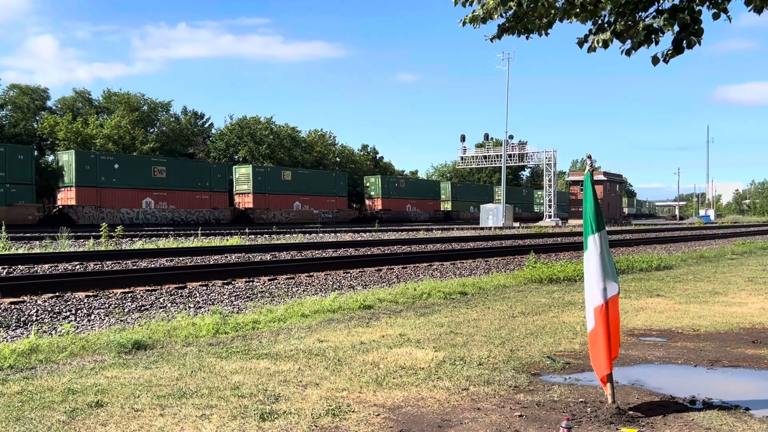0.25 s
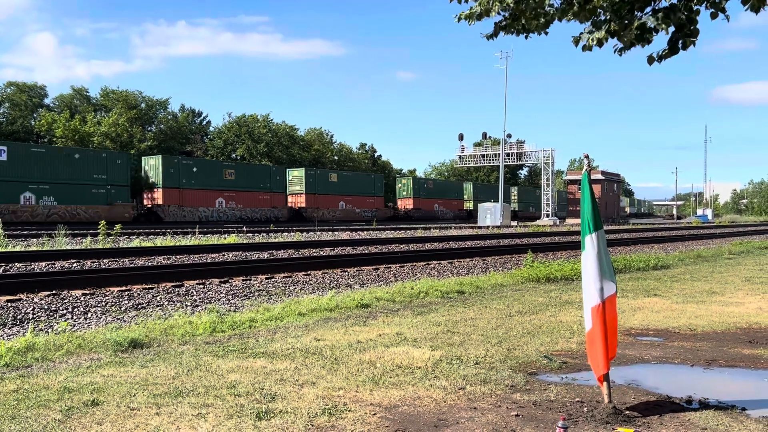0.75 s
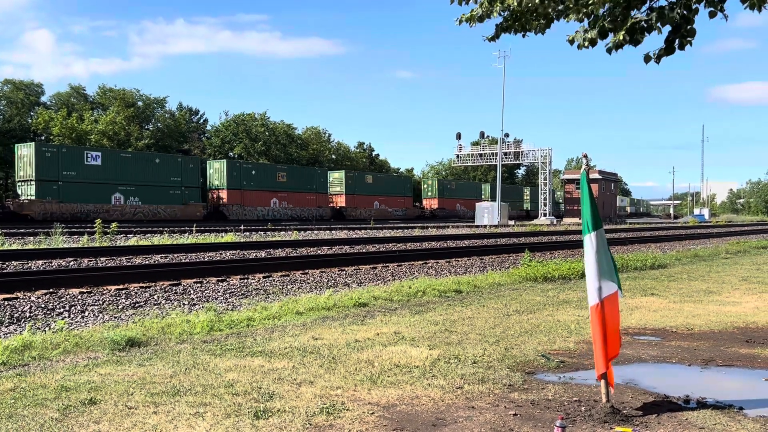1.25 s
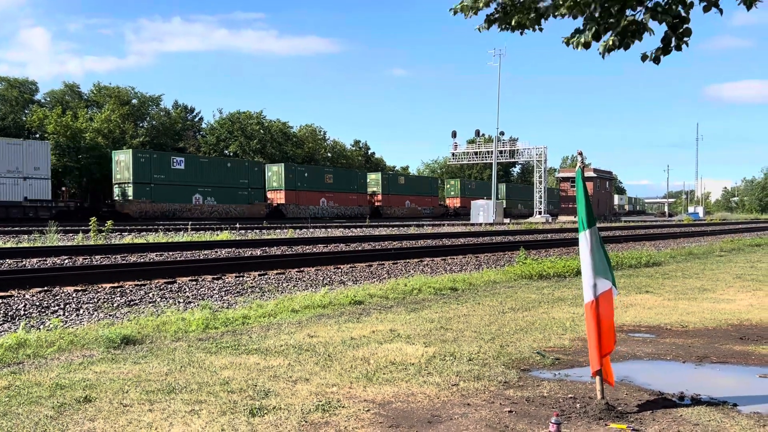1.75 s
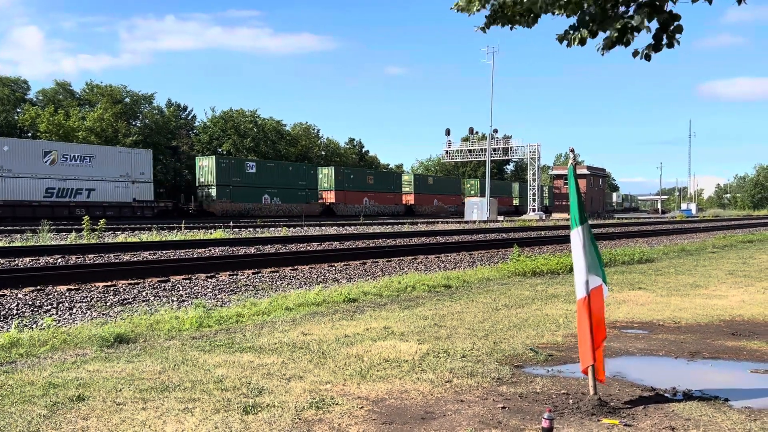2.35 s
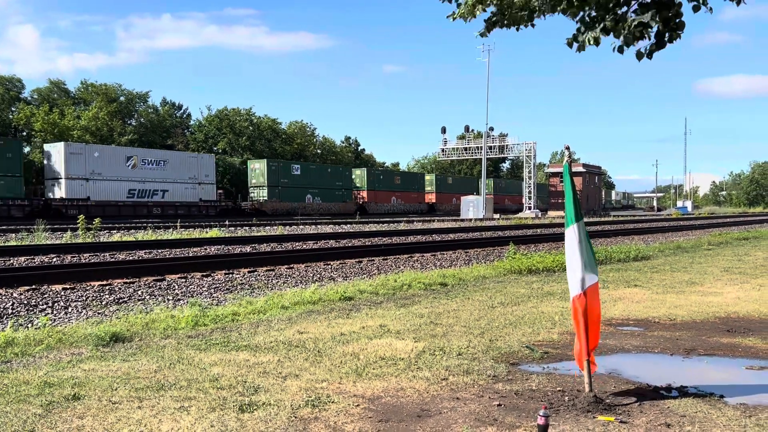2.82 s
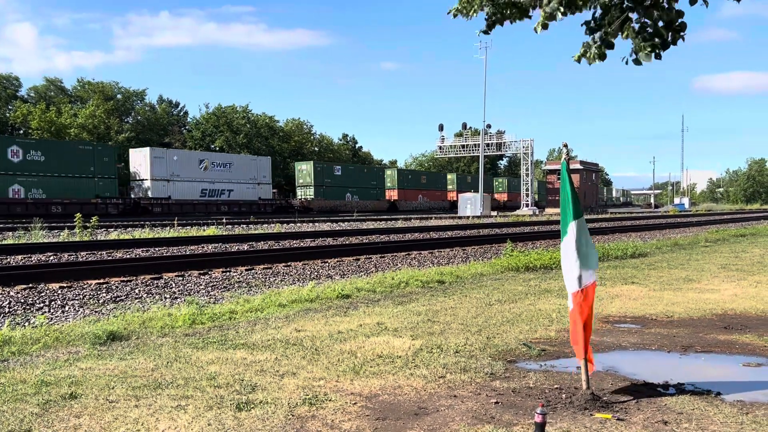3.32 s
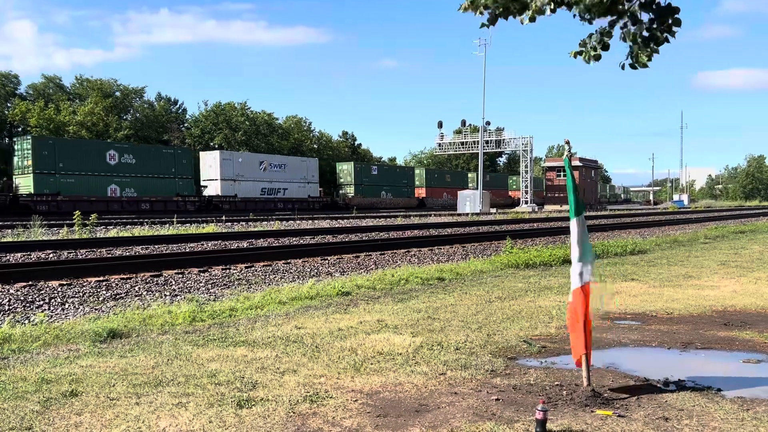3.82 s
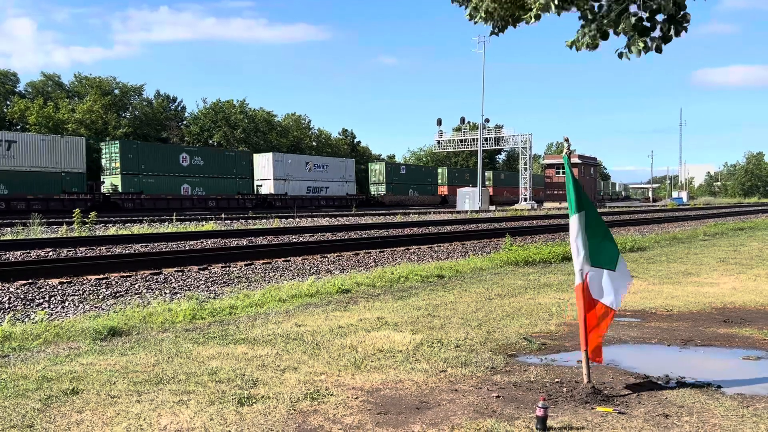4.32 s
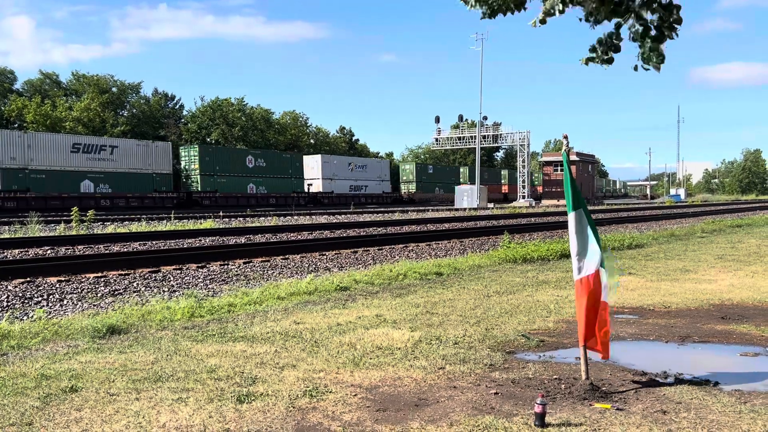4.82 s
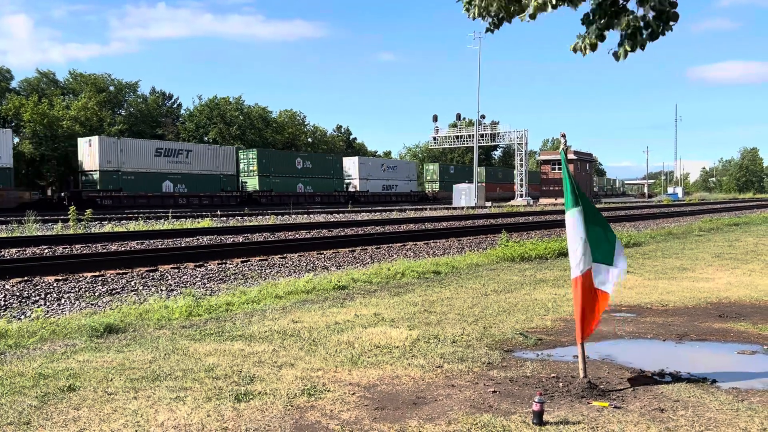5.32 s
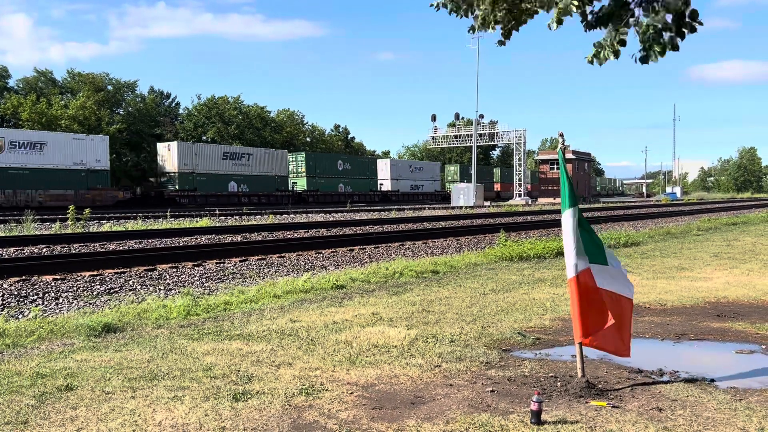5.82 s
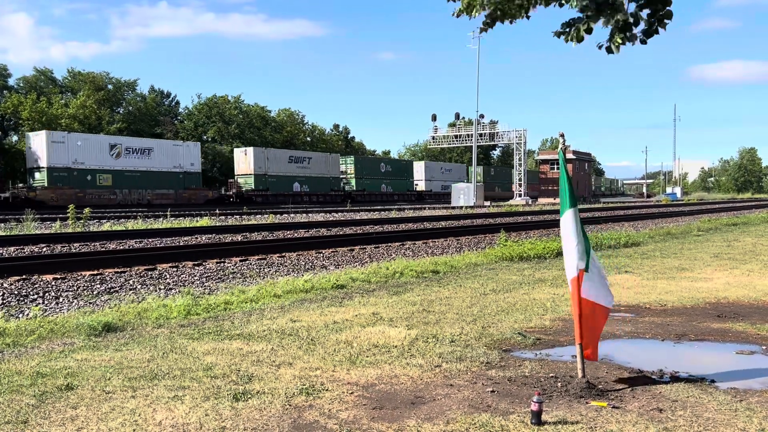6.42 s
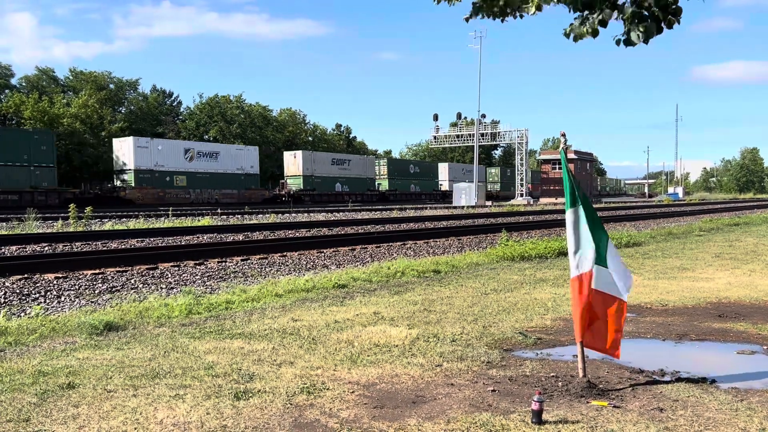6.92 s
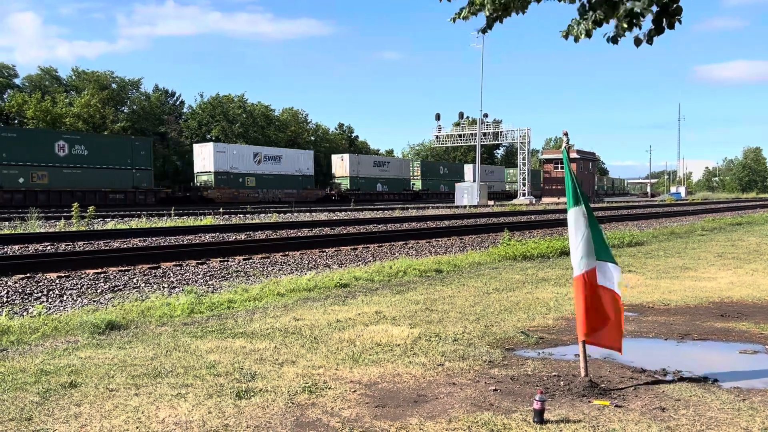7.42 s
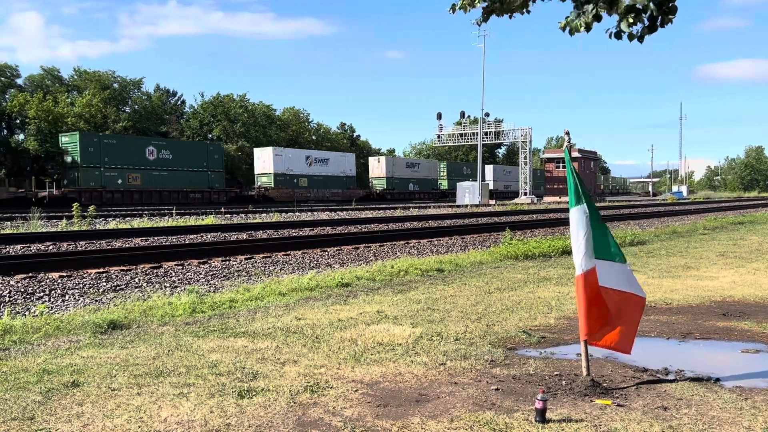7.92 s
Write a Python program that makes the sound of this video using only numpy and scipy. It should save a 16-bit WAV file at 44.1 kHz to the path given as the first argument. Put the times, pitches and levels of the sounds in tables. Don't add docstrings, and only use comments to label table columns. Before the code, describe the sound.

A steady low train rumble and grinding roar runs throughout, heard from an open grassy trackside. Wheels briefly scrape and sing against the rail: light chirps at first, harsh high metallic squeals around two to three and a half seconds, and a longer ringing one after seven. Lumpy wind buffets and soft thuds hit the unshielded phone microphone, with less low end after about four seconds.

```python
import sys
import numpy as np
from scipy import signal
from scipy.fft import rfft, irfft, next_fast_len
from scipy.io import wavfile
from scipy.ndimage import uniform_filter1d, map_coordinates

SR = 44100
rng = np.random.default_rng(int(sys.argv[2]) if len(sys.argv) > 2 else 0)


def master_out(mix):
    frames = np.transpose(np.atleast_2d(mix))
    ceiling = np.clip(frames, -1, 1)
    pcm = np.round(ceiling * 32767).astype(np.int16)
    wavfile.write(sys.argv[1], SR, pcm)


def attenuation_scalar(level_db):
    decades = np.asarray(level_db, float) / 20
    return 10 ** decades


N = 359856

# pitch in Hz, level in dB over the scrape, level in dB of its twin just above.
WORN = [(1830, -9, -30), (2370, -16, -30), (3246, -15, -30), (4039, -13, -25), (4912, -12, -13),
        (5794, -11, -20), (6690, -7, -12), (7577, -8, -17), (8449, -6, -10), (9336, -12, -18),
        (10243, -8, -25), (11133, -7, -22), (12025, -10, -20), (12913, -11, -20)]
LARGE = [(1894, -11, -30), (2445, -14, -30), (3165, -16, -30), (4018, -11, -25), (4884, -11, -25),
         (5743, -9, -14), (6628, -9, -14), (7501, -7, -10), (8403, -13, -15), (9277, -8, -16),
         (10165, -16, -15), (11051, -12, -20), (11947, -15, -22), (12830, -16, -24)]
SMALL = [(1731, -8, -30), (2570, -12, -11), (3363, -8, -30), (3450, -4, -20), (4130, -15, -25),
         (4290, -10, -11), (5165, -10, -13), (6090, -11, -12), (6924, -19, -13), (7905, -21, -9),
         (8875, -25, -10), (11845, -28, -16), (13062, -22, -28), (14150, -21, -28)]
# start in seconds, length in seconds, scrape level in dB, change in dB over the grip.
GRIPS = [(.07, .22, -41, -6.5), (0.857, 0.18, -44, -2), (1.4, 0.17, -49.5, -6.5), (2.319, 0.1, -33, -5),
         (2.44, 0.33, -35.5, 3), (3.008, 0.091, -30.5, -4), (3.133, 0.16, -29, -7),
         (3.348, 0.087, -34, -5.5), (3.507, 0.2, -44, -5.5), (3.797, .2, -42, -2), (4.215, 0.38, -49, -6),
         (5.124, 0.056, -42.5, -6.5), (6.1, 0.12, -48.5, -5.5), (6.46, 0.13, -48.5, -4),
         (6.86, .07, -40.5, -6.5), (6.97, 0.17, -48.5, -3.5), (7.309, 0.51, -34.5, 3.5),
         (7.861, 0.29, -37.5, -2.5)]


def unit(x):
    return x / np.sqrt(np.mean(x ** 2) + 1e-20)


def along(points, hz):
    f, *columns = np.transpose(points)
    return [np.interp(np.log(hz + 1), np.log(f + 1), column) for column in columns]


def curves(rows):
    s, *columns = np.transpose(rows)
    return [np.interp(np.arange(N) / SR, s, column) for column in columns]


def wobble(rate):
    return map_coordinates(rng.standard_normal(4000), [np.arange(N) * rate / SR])


def filtered(x, response):
    size = next_fast_len(N + 8192)
    spectrum = rfft(x, size) * response(np.fft.rfftfreq(size, 1 / SR))
    return irfft(spectrum, size)[..., :N]


def rush(spectrum, patchy_db):
    z = signal.stft(rng.standard_normal((2, N)), nperseg=512)[2]
    patches = uniform_filter1d(rng.standard_normal(z.shape[1:]), size=5, axis=0)
    patches = uniform_filter1d(patches, size=12, axis=1)
    pair = signal.istft(z * attenuation_scalar(patchy_db * unit(patches)), nperseg=512)[1][:, :N]
    return unit(filtered(pair, lambda hz: attenuation_scalar(along(spectrum, hz)[0]) * (hz > 15)))


def rolling():
    # time in seconds, rolling level in dB.
    train_levels = [(0, -36), (.2, -37), (.4, -40), (.8, -41), (1.35, -38.5), (2, -41), (3.3, -38),
                    (3.9, -38), (4.2, -39), (4.55, -42), (5.25, -38.5), (6, -40.5), (6.25, -39),
                    (6.75, -39.5), (7.4, -41), (7.85, -40), (8.16, -42.5)]
    # frequency in Hz, level in dB per Hz.
    rumble_colour = [(12, -47), (20, -44), (45, -3), (76, 2), (119, -3), (177, -12.5), (222, -10.5),
                     (315, -27.5), (400, -25.5), (520, -51), (880, -120)]
    roar_colour = [(100, -5), (250, -4), (600, -5.5), (1000, -6), (1800, -11.5), (2500, -16.5),
                   (4000, -22.5), (7000, -31), (11000, -43), (14500, -52), (14900, -70)]
    # pitch in Hz, width in Hz, level in dB over the roar.
    wheel_discs = [(1800, 250, -2), (2680, 200, -2), (3480, 180, -3), (4600, 300, -8)]

    rolling_db, = curves(train_levels)
    boom = rush(rumble_colour, patchy_db=1.45)
    boom += 0.04 * (boom ** 2 - 1)
    boom_db = -19.5 + 0.55 * (rolling_db - rolling_db.mean())

    def discs(hz):
        rings = [attenuation_scalar(db) * 1j * hz * width / (centre ** 2 - hz ** 2 + 1j * hz * width)
                 for centre, width, db in wheel_discs]
        return 1 + sum(rings)

    roar = filtered(rush(roar_colour, patchy_db=1.36), discs)
    roar *= attenuation_scalar(0.6 * wobble(7))
    return attenuation_scalar(boom_db) * boom + attenuation_scalar(rolling_db + 7.5) * roar


def grip(t, start, length, db, change_db):
    rise, fall = 400, 87
    hold = db + change_db * np.clip((t - start) / length, 0, 1)
    return hold - rise * np.maximum(start - t, 0) - fall * np.maximum(t - start - length, 0)


def jitter(width_hz):
    pole = np.exp(-np.pi * width_hz / SR)
    gain = np.sqrt((1 - pole ** 2) / 2)
    return signal.lfilter([gain], [1, -pole], rng.standard_normal((2, N))).T @ [1, 1j]


def ladder(wheel, count):
    hz, db, twin_db = np.transpose(wheel)
    more = np.arange(1, count + 1)
    rungs = hz[-1] + (hz[-1] - hz[-2]) * more
    rungs_db = db[-1] - 3 * more
    return zip(np.r_[hz, rungs, 1.0165 * hz], np.r_[db, rungs_db, twin_db])


def lock(t, s, spread):
    return np.exp(-np.abs((t - s) / (0.93 * spread)) ** 2.6)


def singing():
    axles = [(WORN, 1.03), (WORN, 1), (WORN, 1), (WORN, 1), (WORN, 1), (LARGE, 1), (LARGE, 1), (LARGE, 1),
             (LARGE, .99), (SMALL, 1.048), (SMALL, 1.02), (SMALL, 1.042), (SMALL, 1.011), (SMALL, 1.011),
             (SMALL, 1.011), (SMALL, 1.011), (SMALL, 1), (SMALL, .995)]
    # middle in seconds, reach to either side in seconds, pitch in Hz, level in dB.
    squeals = [(2.3, .02, 3230, -40), (2.47, .022, 3246, -34), (2.54, .05, 3855, -42),
               (2.48, .04, 6690, -36), (2.49, .09, 7577, -37), (2.69, .06, 4039, -33), (2.7, .1, 5794, -38),
               (2.74, .06, 8449, -33), (2.77, .05, 9336, -35), (2.67, .07, 11133, -35),
               (3.04, .04, 3165, -31), (3.05, .04, 4018, -29), (3.04, .04, 8403, -34),
               (3.06, .05, 6741, -37), (3.09, .08, 4884, -35), (3.18, .05, 4070, -37),
               (3.17, .04, 5743, -35), (3.14, .07, 9277, -35), (3.39, .04, 5744, -39),
               (7.41, .07, 1731, -32), (7.45, .14, 3450, -32), (7.49, .05, 3824, -37),
               (7.52, .04, 4370, -38), (7.64, .06, 5937, -36), (7.72, .1, 3363, -32),
               (7.77, .09, 7037, -35), (7.75, .09, 9022, -32), (7.79, .05, 8609, -34),
               (7.8, .06, 9640, -37), (7.8, .06, 12040, -37),
               (.1, .07, 2551, -41), (.1, .035, 5019, -38), (.1, .04, 5089, -38), (.23, .13, 5089, -50),
              (.22, .05, 4185, -46), (.855, .02, 2700, -39), (.95, .1, 6778, -53), (.92, .08, 8582, -51),
              (3.6, .09, 4830, -41), (3.62, .07, 5373, -47), (3.84, .04, 1802, -36), (3.95, .1, 1790, -39),
              (3.84, .07, 2740, -39), (3.88, .045, 3626, -40), (3.94, .06, 8437, -50),
              (4.3, .08, 4500, -50), (5.15, .04, 7329, -52), (6.18, .05, 4455, -50), (6.75, .3, 13320, -60),
              (6.89, .04, 6162, -44), (6.88, .04, 8125, -45), (6.92, .05, 7124, -51),
              (6.87, .03, 3400, -45), (7.79, .04, 5023, -40), (7.9, .03, 2611, -45), (7.98, .07, 3681, -41),
              (8.01, .07, 3443, -43), (8.08, .06, 7009, -45), (8.08, .06, 7992, -38),
              (8.05, .05, 8991, -43)]

    narrow, wide = jitter(30), jitter(95)
    slow = wobble(20)
    song = np.zeros(N)

    def add(start, end, hz, shaken, locked):
        first, last = max(round(start * SR), 0), min(round(end * SR), N)
        t = np.arange(first, last) / SR
        skip = int(rng.random() * (N - SR))
        own = slice(skip, skip + last - first)
        clear = np.clip((hz - 1400) / 2000, 0.2, 1)
        blur = clear * (0.75 + 0.55 * narrow[own]) + (0.61 + 0.7 * (1 - clear)) * wide[own]
        swing = shaken(t) * blur * attenuation_scalar(3 * slow[own])
        swing = swing + locked(t) * (0.9 + 0.5 * narrow[own] + 0.45 * wide[own])
        song[first:last] += np.sqrt(2) * np.real(swing * np.exp(2j * np.pi * hz * t))

    every_t = np.arange(N) / SR
    for row, (wheel, ratio) in zip(GRIPS, axles):
        start, length = row[:2]
        drive = attenuation_scalar(1.55 * (grip(every_t, *row) + 32) - 31.5)
        drive = drive * np.clip((every_t - start) / 0.04 + 1, 0, 2) / 2
        for hz, mode_db in ladder(wheel, count=3):
            when, long = rng.random(2)

            def shaken(t):
                return attenuation_scalar(mode_db) * drive[round(t[0] * SR):][:len(t)]

            def locked(t):
                return shaken(t) * attenuation_scalar(1) * lock(t, start + when * length, 0.055 * (0.5 + long))

            add(start - 0.06, start + length + 0.2, ratio * hz, shaken, locked)
    for s, spread, hz, db in squeals:
        add(s - 2 * spread, s + 2 * spread, hz, np.zeros_like,
            lambda t: attenuation_scalar(db + 1.3) * lock(t, s, spread))
    return song


def flanges():
    # frequency in Hz, level in dB per Hz.
    scrape_colour = [(1500, -7), (2500, -4.5), (4000, 5), (6500, -1), (9000, -3.5), (11500, -16),
                     (14500, -18), (15000, -35)]
    grind_colour = [(700, -17), (1400, 3), (2000, -3.5), (3000, -1), (4500, -14.5), (8000, -6),
                    (12500, -11), (14500, -15.5), (15000, -30)]

    t = np.arange(N) / SR
    scrape_db = np.max([grip(t, *row) for row in GRIPS], axis=0)
    scrape_db = np.maximum(scrape_db, -56 + 0.5 * wobble(3.15))
    hiss_db = scrape_db - 0.45 * np.maximum(scrape_db + 53, 0)
    hiss = attenuation_scalar(hiss_db + 6.5 + 0.27 * wobble(11)) * rush(scrape_colour, patchy_db=3.0)
    grind = attenuation_scalar(0.8 * wobble(14)) * rush(grind_colour, patchy_db=1.2)
    hiss += attenuation_scalar(0.88 * (scrape_db + 37.0) - 36.5) * grind

    song = singing()
    tail_t = t[:SR // 2]
    tail = rng.standard_normal(len(tail_t)) * attenuation_scalar(-60 * tail_t / 0.34)
    echo = signal.fftconvolve(song, tail / np.linalg.norm(tail))[:N]
    return hiss + np.array([song + attenuation_scalar(-7) * echo, echo])


def ports(sound):
    # frequency in Hz, likeness of the channels from 0 to 1, left excess in dB, right lead in radians.
    stereo_rows = [(40, 0.95, -0.5, 0.5), (200, 0.91, .5, -0.51), (386, 1, 2, -1), (656, 0.9, 4, -2.02),
                   (950, 0.8, 1.5, -2), (1294, 0.67, -5.5, -3), (1920, 0.82, 1.5, -6), (2320, 0.94, 3, -5.5),
                   (2690, 0.73, 0.5, -5), (4230, 0.41, 2, -7), (5150, 1, 0.5, -6), (5860, 1, 0.5, -4.5),
                   (6260, 0.98, -0.5, -9)]

    def response(hz):
        alike, left_db, lead = along(stereo_rows, hz)
        lead = np.where(hz > stereo_rows[-1][0], 2 * np.pi * (hz - 6700) / 6300, lead)
        turn = np.arccos(np.clip(alike, 0, 1)) / 2
        left = attenuation_scalar(left_db / 2) * np.exp(-0.5j * lead)
        return np.array([[np.cos(turn) * left, np.sin(turn) * left],
                         [np.cos(turn) / left, -np.sin(turn) / left]])

    return filtered(sound[None], response).sum(axis=1)


def breeze():
    # time in seconds, buffet level in dB.
    breeze_levels = [(0, -55), (.6, -40), (1.2, -36), (2.3, -39.5), (2.8, -43), (3, -33.5), (3.2, -34),
                     (3.4, -29.5), (3.8, -29), (4, -32), (4.2, -29), (4.5, -31.5), (5, -36), (5.4, -37.5),
                     (6.2, -32), (6.6, -38.5), (7, -33.5), (8.16, -36.5)]
    # start of the slap in seconds, peak in dB.
    slap_times = [(3.017, -11), (3.194, -8), (3.326, -15), (3.522, -13), (3.564, -7), (3.639, -19),
                  (3.711, -14), (3.901, -14.5), (4.084, -18), (4.254, -6), (4.285, -9.5), (4.455, -13),
                  (4.478, -11), (4.691, -18), (4.828, -16), (5.042, -16.5), (5.158, -17), (5.352, -19),
                  (5.517, -16.5), (5.638, -17), (5.697, -17.5), (6.086, -14.5), (6.163, -15.5),
                  (6.246, -7.5), (6.389, -14), (6.509, -14.5), (6.607, -15.5), (6.735, -18), (7.416, -16.5),
                  (8.014, -16.5)]
    # frequency in Hz, level in dB per Hz.
    buffet_colour = [(25, -36), (60, -1), (130, 1.5), (250, -7.5), (500, -10), (900, -24), (1600, -73)]
    slap_colour = [(30, -20), (65, -2.5), (150, 7.5), (300, 0.5), (550, -11.5), (900, -26), (1500, -63)]

    buffet_db, = curves(breeze_levels)
    a, b = rush(buffet_colour, patchy_db=2.0)
    lumps = attenuation_scalar(1.7 * np.array([wobble(22), wobble(22)]))
    wind = attenuation_scalar(buffet_db + 6.0) * unit(lumps * [a + 0.81 * b, a - 0.68 * b])

    eddies = rush(slap_colour, patchy_db=3.5)
    t = np.arange(SR // 12) / SR
    shape = attenuation_scalar(-60 * t / 0.07) * (1 - np.exp(-t / 0.0041))
    for s, db in slap_times:
        first = round(s * SR)
        push = eddies[:, first:][:, :len(t)] * shape
        push = push[0] + 0.16 * push[1] * [[1], [-1]]
        wind[:, first:][:, :len(t)] += attenuation_scalar(db + 2.5) * push / np.abs(push).max()
    return wind


def scene():
    return ports(rolling() + flanges()) + breeze()


def low_pass(x):
    return signal.sosfilt(signal.butter(12, 15730, fs=SR, output="sos"), x)


def record(dry):
    cut = np.clip((np.arange(N) / SR - 3.92) / 0.043, 0, 1)
    less_bass = filtered(dry, lambda hz: attenuation_scalar(-10.5 / (1 + (hz / 153) ** 2)))
    thin = dry + cut * (less_bass - dry)
    soft = thin / (1 + np.abs(thin / 0.9) ** 4) ** (1 / 4)
    return low_pass(soft)


dry = scene()
out = record(dry)
master_out(out)
```